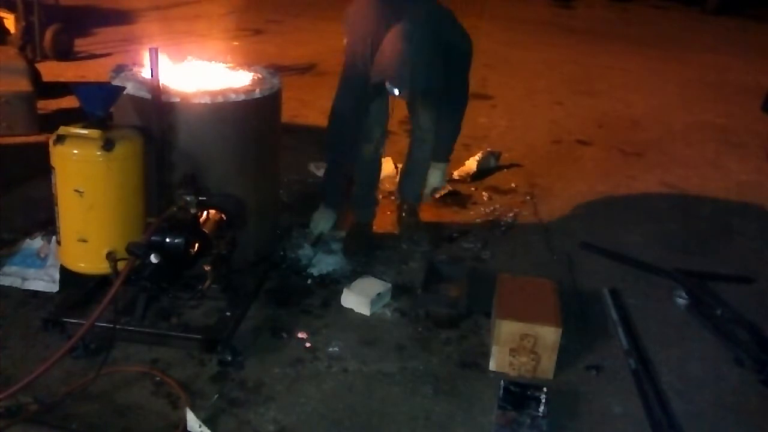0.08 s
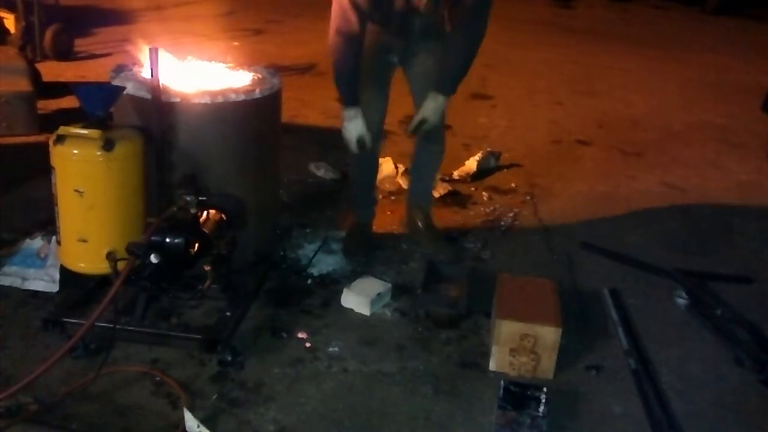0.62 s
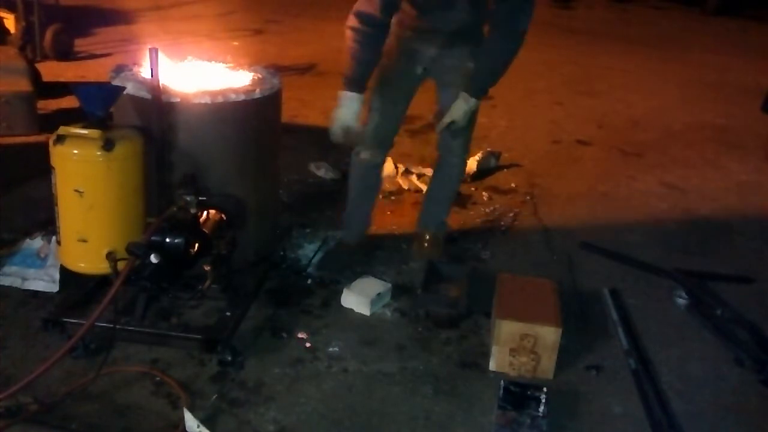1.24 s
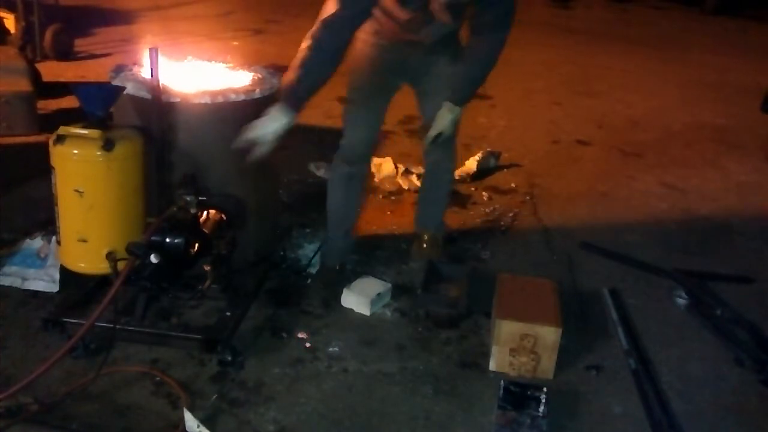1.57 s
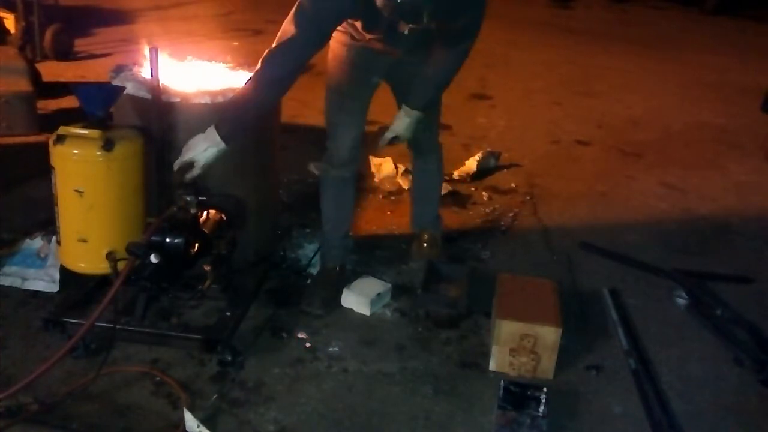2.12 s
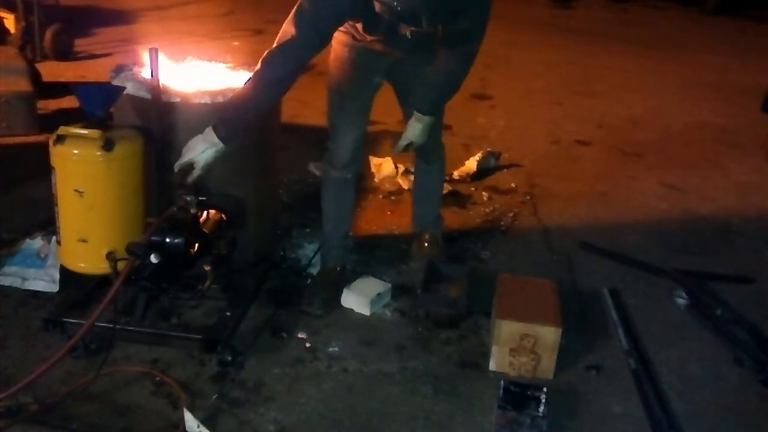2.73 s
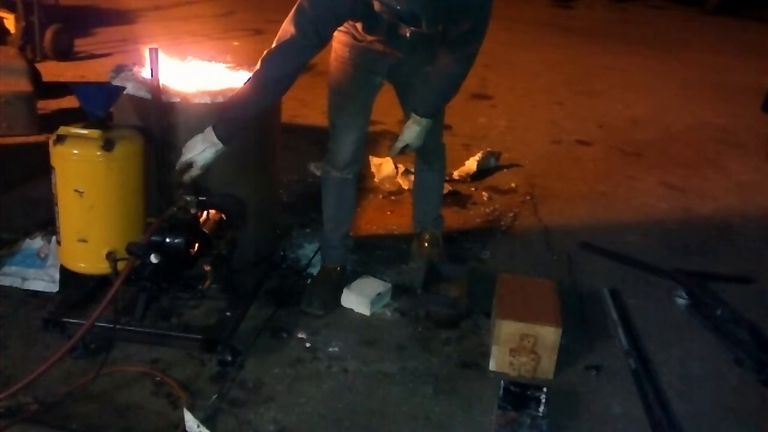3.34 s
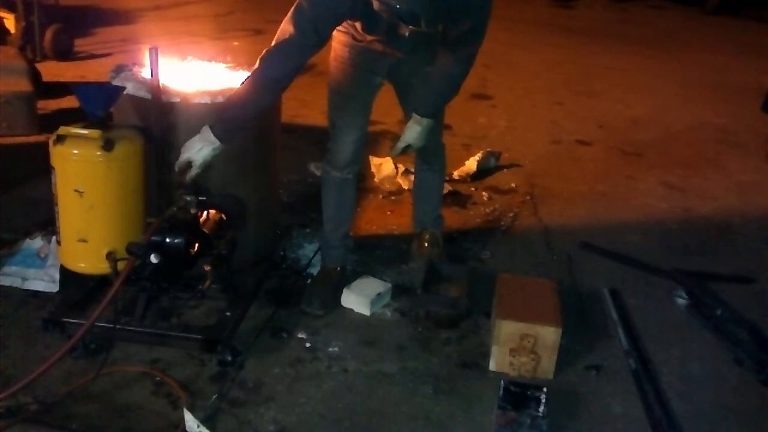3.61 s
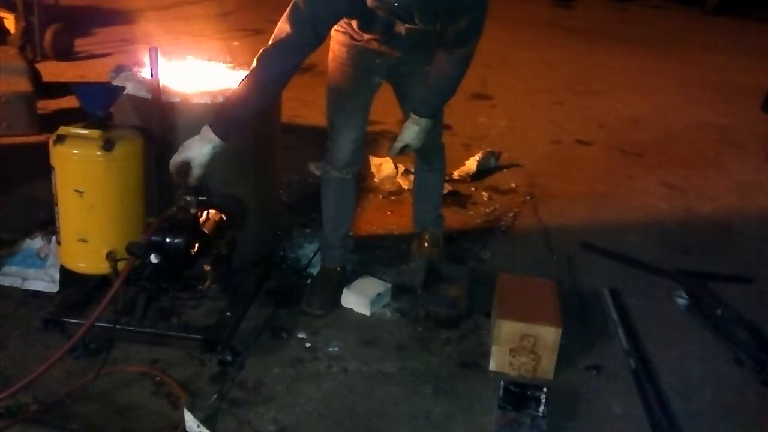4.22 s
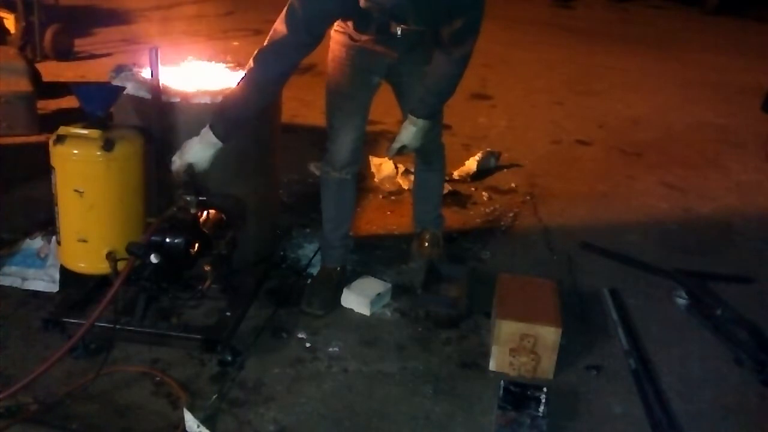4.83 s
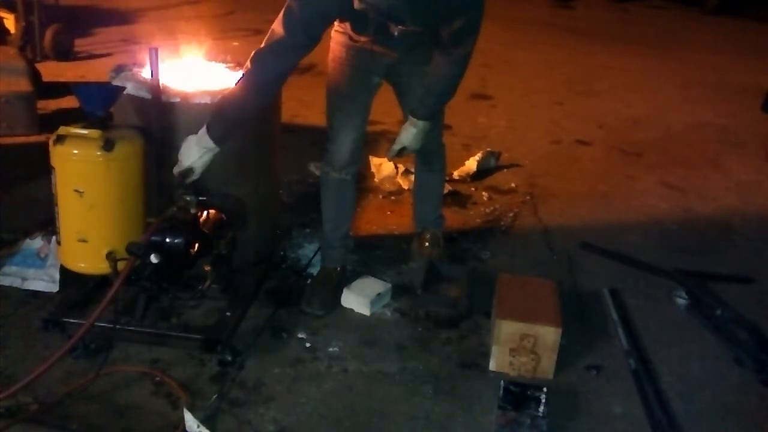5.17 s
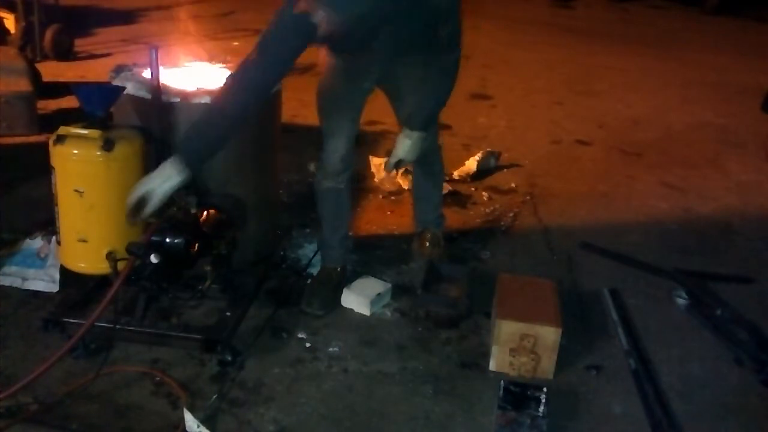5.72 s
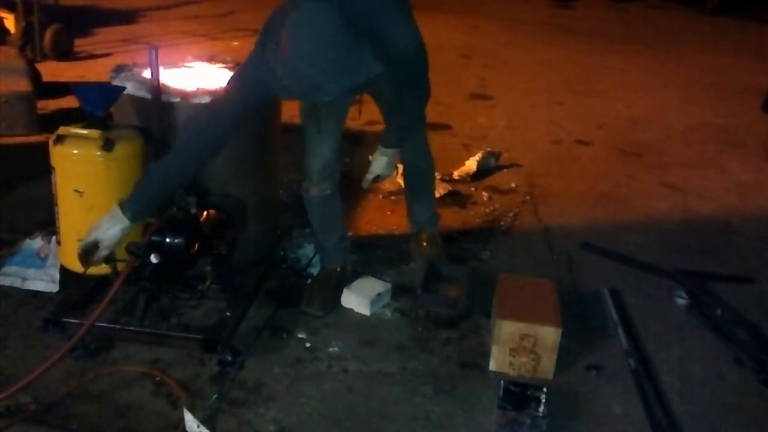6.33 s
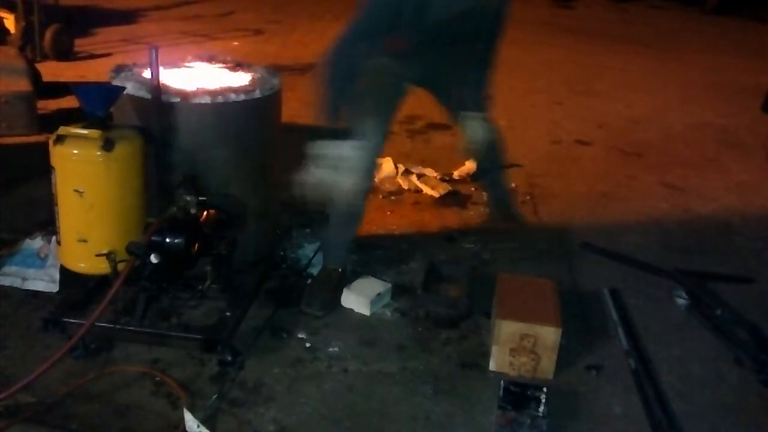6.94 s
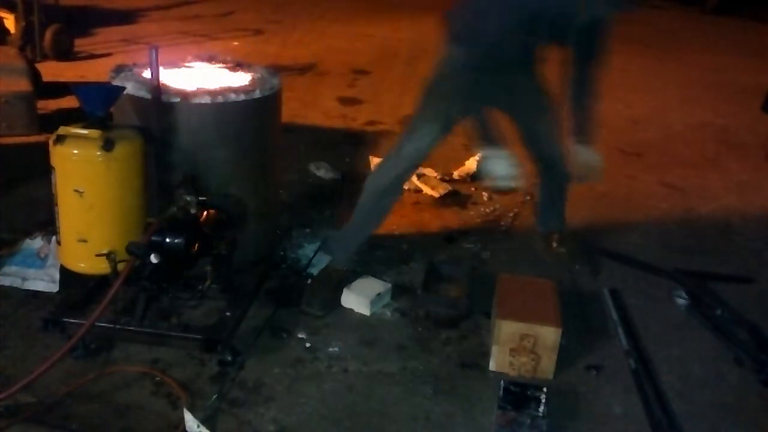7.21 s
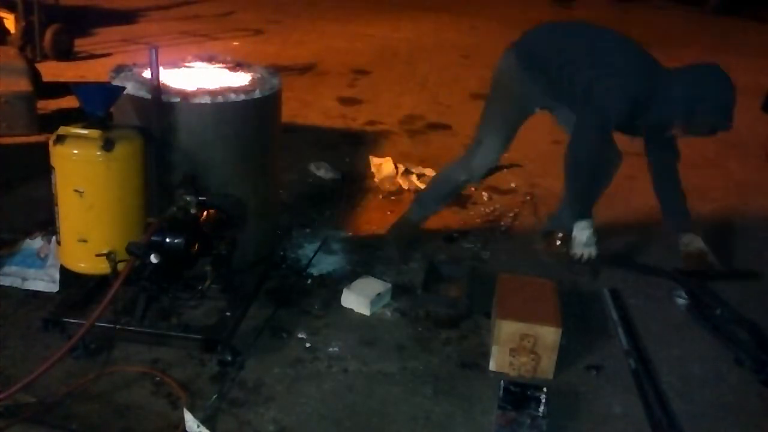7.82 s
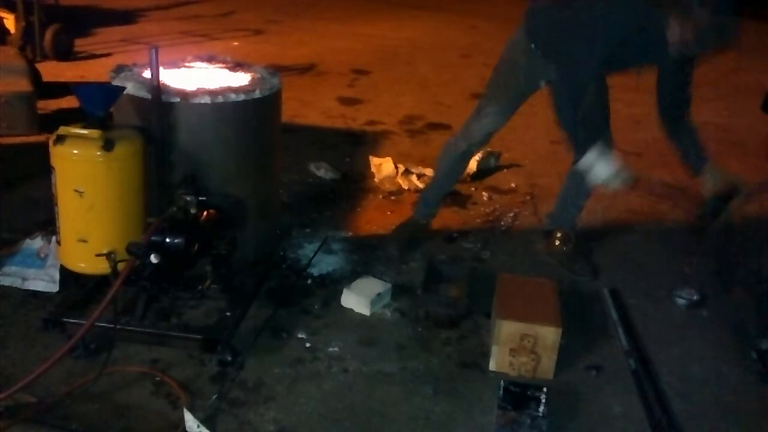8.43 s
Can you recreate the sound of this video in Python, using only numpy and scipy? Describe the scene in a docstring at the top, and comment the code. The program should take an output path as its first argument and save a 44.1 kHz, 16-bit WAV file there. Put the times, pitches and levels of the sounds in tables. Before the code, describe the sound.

From the start, an air-blown burner roars in a small furnace nearby, low and turbulent, throbbing unevenly over the hiss of its nozzle. At about 4 seconds a valve is eased: the flame turns softer and deeper, and a high hiss joins in. Around 4.5 seconds a second turn brings a brief, wavering whistle that falls in pitch, and the roar dies away by 5 seconds. The air jet stops at about 5.3 seconds. What remains is much quieter: a thin, steady hiss like a leaking line over the workshop's low hum. At 6.5 seconds the fuel tank gives a very faint ring as a hand brushes it. A foot lands with a soft, dull thud near 7.2 seconds. At about 8.5 seconds a steel tool scrapes briefly on the concrete with a sharp, bright clank.

```python
"""A workshop floor, where an air-blown burner roars in a small melting furnace.
Turbulent burning rings the furnace and air hisses through the nozzle. A valve is closed in two turns,
its narrowing gap whistling downward; the flame goes soft and dies, and the air jet stops.
A thin hiss stays over the room's hum, like a leaking line. A hand brushes the fuel tank, a foot lands,
then a steel tool scrapes and clanks on the concrete."""
import sys
import numpy as np
from scipy.fft import rfft, irfft, next_fast_len
from scipy.io import wavfile
from scipy.ndimage import uniform_filter1d, minimum_filter1d

SR = 44100
rng = np.random.default_rng(int(sys.argv[2]) if len(sys.argv) > 2 else 0)


def bounce(signal):
    """Save signal as a 16-bit WAV file at the path given by the first command-line argument."""
    frames = np.transpose(np.atleast_2d(signal))
    limited = np.clip(frames, -1, 1)
    pcm = np.round(limited * 32767).astype(np.int16)
    wavfile.write(sys.argv[1], SR, pcm)


N = 378819
TIME = np.arange(N) / SR
FFT_SIZE = next_fast_len(N + SR // 4)
HZ = np.maximum(np.arange(FFT_SIZE // 2 + 1) * SR / FFT_SIZE, 1)
DIRECT = np.array([[1], [0]])   # sources are (direct, scattered) pairs; this one is direct only


def from_db(db):
    """Decibels to gain."""
    return 10 ** (np.asarray(db) / 20)


def unit_rms(x):
    """Scale to unit power."""
    return x / np.sqrt(np.mean(x ** 2) + 1e-20)


def over_time(rows):
    """Interpolate each column after the time column, per sample."""
    times_s, *columns = np.transpose(rows)
    return [np.interp(TIME, times_s, column) for column in columns]


def over_hz(points):
    """Interpolate on a log frequency axis."""
    hz, value = np.transpose(points)
    return np.interp(np.log(HZ), np.log(hz), value)


def filtered(x, response):
    """Apply a frequency response."""
    return irfft(rfft(x, FFT_SIZE) * response, FFT_SIZE)[..., :N]


def lowpass(corner_hz, order):
    """Response that halves at the corner."""
    return 1 / (1 + (HZ / corner_hz) ** order)


def peak(centre_hz, half_width_hz):
    """Response of one resonance, 1 at its centre."""
    return 1 / (1 + ((HZ - centre_hz) / half_width_hz) ** 2)


def colour(spectrum, resonances=()):
    """Broad spectrum plus resonances, rolled off below 20 Hz."""
    lift_db = sum(db * peak(hz, width_hz / 2) for hz, width_hz, db in resonances)
    return from_db(over_hz(spectrum) + lift_db) * (1 - lowpass(20, 2))


def noise(response):
    """Two independent noises of one colour: direct and scattered."""
    return unit_rms(filtered(rng.standard_normal((2, N)), response))


def drift(rate_hz):
    """Random wander at unit RMS."""
    return unit_rms(filtered(rng.standard_normal(N), lowpass(rate_hz, 4)))


def air_band(pitch_hz, half_width_hz):
    """Noise band centred on a moving pitch."""
    phase = 2 * np.pi * np.cumsum(pitch_hz) / SR
    narrow = lowpass(half_width_hz, 2)
    return noise(narrow) * np.cos(phase) + noise(narrow) * np.sin(phase)


def reflections(level_db, above_hz, count=60):
    """Echoes from floor, gear and walls comb the treble."""
    echoes = np.zeros((2, N))
    for row in echoes:
        signs = rng.choice([-1, 1], count)
        delays_s = rng.uniform(.006, .035, count)
        row[(delays_s * SR).astype(int)] = signs / np.sqrt(count)
    share = from_db(level_db) * (1 - lowpass(above_hz, 2))
    return (1 + share * rfft(echoes, FFT_SIZE)) / np.sqrt(1 + share ** 2)


def bursts(rows, t60_s):
    """Envelope of blows: instant attack, exponential decay."""
    return sum((TIME >= s) * from_db(db - 60 * np.abs(TIME - s) / t60_s) for s, db in rows)


def swell(at_s, rise_s, fall_s):
    """Smooth rise to 1 and fall back."""
    return np.exp(-((TIME - at_s) / np.where(TIME < at_s, rise_s, fall_s)) ** 2)


def hand_turn(start_s, length_s):
    """Smooth ramp from 0 to 1."""
    return .5 - .5 * np.cos(np.pi * np.clip((TIME - start_s) / length_s, 0, 1))


# Room hum. Each row: frequency in Hz, relative density in dB.
HUM_SPECTRUM = [(22, -2.5), (56, 4.5), (95, -4.5), (130, 0.5), (190, -11), (280, -11), (450, -16),
                (730, -16.5), (850, -19), (1100, -31), (2000, -25), (5000, -35.5)]
# Each row: centre in Hz, width in Hz, lift in dB.
HUM_RESONANCES = [(239, 16, 5), (766, 40, 2)]
# Each row: frequency in Hz, level in dB.
MOTOR_TONES = [(272.8, -56.5), (409.1, -53)]

def workshop(hum_db=-38.0):
    """Low room noise with the faint tones of a distant motor."""
    hum = noise(colour(HUM_SPECTRUM, HUM_RESONANCES) * reflections(level_db=-6.0, above_hz=500))
    motor = sum(from_db(db) * np.sin(2 * np.pi * hz * TIME) for hz, db in MOTOR_TONES)
    return from_db(hum_db) * hum + DIRECT * motor


# Each row: frequency in Hz, relative density in dB.
LEAK_SPECTRUM = [(1000, -11.5), (1900, -16), (2650, -10), (3200, -1), (3900, 0.5), (4400, -10.5),
                 (5000, -4.5), (5800, -6.5), (6600, -10.5), (8000, -19), (11000, -20), (12200, -14),
                 (14500, -35)]
# Each row: centre in Hz, width in Hz, lift in dB.
LEAK_RESONANCES = [(2835, 55, 6), (3260, 45, 6), (3488, 52, 7), (3725, 77, 5.5), (5680, 48, 8)]
# Each row: time in seconds, level in dB before gain_db.
LEAK_LEVELS = [(5.4, -43), (6.3, -43.5), (6.75, -45.5), (7.6, -43.5), (8.4, -45.5)]

def leak(gain_db=5.0):
    """A thin hiss, like a leaking line, that outlasts the flame."""
    level_db, = over_time(LEAK_LEVELS)
    hiss = noise(colour(LEAK_SPECTRUM, LEAK_RESONANCES) * reflections(level_db=-2.5, above_hz=1500))
    return from_db(level_db + gain_db) * hiss


# Each row: start in seconds, level in dB.
TANK_TOUCHES = [(6.51, -41)]

def tank(ring_hz=775, t60_s=.3):
    """The fuel tank rings softly as the hand lets go of its tap."""
    return DIRECT * bursts(TANK_TOUCHES, t60_s) * np.sin(2 * np.pi * ring_hz * TIME)


# Each row: start in seconds, level in dB.
FOOTSTEPS = [(7.17, -29.5)]

def footstep(thud_hz=130, t60_s=0.21):
    """A foot lands on the floor with a dull thud."""
    return bursts(FOOTSTEPS, t60_s) * noise(HZ * lowpass(thud_hz, 6))


# Tool strikes on the floor. Each row: start in seconds, relative level in dB.
KNOCKS = [(8.482, -27), (8.521, -11.5), (8.5245, -7.5), (8.5384, -21)]
# Pitches that ring in the clank, from tool and recorder housing.
# Each row: frequency in Hz, relative level in dB, T60 in seconds.
CLANK_MODES = [(928, -18, .15), (1520, -11, .08), (2090, 1, 0.054), (2225, 2, 0.083), (2470, 0, .13),
               (2925, -1, .08), (3230, -1, .09), (3518, 6, 0.063), (3607, -3, .1), (3811, -4, .12),
               (4254, -3, .1), (5380, -1, .06), (6169, -5, .08), (6480, -8, .06)]
# Steel on concrete. Each row: frequency in Hz, relative density in dB.
CRUNCH_SPECTRUM = [(300, -25), (850, -12), (1700, -11), (2150, 3), (2600, 2.5), (3600, 2), (4800, -3),
                   (6500, -7.5), (9000, -18), (15000, -42)]

def tool_drag(start_s=8.486, attack_s=0.012, hold_s=0.059, t60_s=.075, drag_db=-23.5, grain_db=2):
    """Gritty envelope of the tool's short slide over the floor."""
    since_s = TIME - start_s
    bite = np.exp(np.clip(since_s / attack_s, -20, 0))
    release_db = -60 * np.maximum(since_s - hold_s, 0) / t60_s
    return bite * from_db(drag_db + release_db + grain_db * drift(rate_hz=1000))


def tool(knock_t60_s=0.046, crunch_db=-4.5, rub_db=-22, ring_db=-13.0, contact_hz=13000,
         tail_db=-12, tail_t60_s=0.32):
    """Drag and knocks crunch on the concrete and excite a ringing clank; the walls add a tail."""
    drag = tool_drag()
    crunch = (drag + bursts(KNOCKS, knock_t60_s)) * noise(colour(CRUNCH_SPECTRUM))
    force = from_db(rub_db) * drag * rng.standard_normal((2, N))
    for start_s, db in KNOCKS:
        force[0, round(start_s * SR)] += from_db(db)   # direct only
    t = TIME[:SR // 4]
    modes = sum(from_db(db - 60 * t / t60_s) * np.cos(2 * np.pi * hz * t)
                for hz, db, t60_s in CLANK_MODES)
    ring = filtered(force, rfft(modes, FFT_SIZE) * lowpass(contact_hz, 6))
    clank = from_db(crunch_db) * crunch + from_db(ring_db) * ring
    walls = rng.standard_normal((2, len(t))) * from_db(-60 * t / tail_t60_s)
    walls = unit_rms(walls) / np.sqrt(len(t))   # unit energy
    return clank + from_db(tail_db) * filtered(clank, rfft(walls, FFT_SIZE))


EASED = hand_turn(start_s=3.88, length_s=0.32)
THROTTLED = hand_turn(start_s=4.521, length_s=.36)
VALVE_SPURT = swell(at_s=4.6, rise_s=0.049, fall_s=0.057)   # hiss swells as the second turn begins

def valve_db(open_db, eased_db=0, throttled_db=0):
    """Open-valve level plus the change from each of the two turns."""
    return open_db + eased_db * EASED + throttled_db * THROTTLED


# Each row: frequency in Hz, relative density in dB.
SEAT_SPECTRUM = [(3000, -14), (4400, -4), (8500, -5), (9400, -1), (10200, -8), (11200, -2.5), (15500, -9)]
# Each row: centre in Hz, width in Hz, lift in dB.
SEAT_RESONANCES = [(8990, 130, 3), (9400, 220, 6.5), (9760, 140, 6)]

def valve_seat(flutter, flutter_db=1.5, spurt_db=5.0):
    """Air squeezed past the nearly shut valve gives a high, half-whistling hiss."""
    level_db = valve_db(-37.0, throttled_db=-1.9) + spurt_db * VALVE_SPURT
    hiss = noise(colour(SEAT_SPECTRUM, SEAT_RESONANCES) * reflections(level_db=-2, above_hz=1000))
    return EASED * from_db(level_db + flutter_db * flutter) * hiss


# Each row: time in seconds, pitch in Hz, level in dB.
WHISTLE_GLIDE = [(4.5, 4450, -49), (4.56, 4320, -28), (4.61, 4080, -28), (4.645, 3800, -22),
                 (4.695, 3200, -34), (4.77, 2760, -38), (4.84, 2280, -47)]

def valve_whistle(waver_hz=80, flicker_db=3.0, octave_db=-15, rush_ratio=1.09):
    """The closing gap sings a falling, wavering tone with a breathy octave, in a band of rushing air."""
    pitch_hz, level_db = over_time(WHISTLE_GLIDE)
    phase = 2 * np.pi * np.cumsum(pitch_hz + waver_hz * drift(rate_hz=346)) / SR
    tone = np.sin(phase) * from_db(flicker_db * drift(rate_hz=81))
    whistle = DIRECT * tone + from_db(octave_db) * air_band(2 * pitch_hz, half_width_hz=260)
    rush = air_band(rush_ratio * pitch_hz, half_width_hz=600)
    rush_db = valve_db(-33.5, throttled_db=-33)
    return EASED * (from_db(level_db) * whistle + from_db(rush_db) * rush)


# Each row: time in seconds, swing about the mean in dB.
SUPPLY_SURGES = [(0.08, 0.5), (0.35, -0.7), (1.47, 1.0), (1.65, -1), (2.25, -1.5), (3.2, 1.64),
                 (3.55, -0.6)]

def surge_db():
    """The air supply swings a little and settles once the valve is eased."""
    swing_db, = over_time(SUPPLY_SURGES)
    return swing_db * (1 - EASED)


# Each row: frequency in Hz, relative density in dB.
JET_SPECTRUM = [(1200, -9.5), (2400, -4.5), (2750, 0.5), (3200, 2.5), (4000, 6), (4600, -0.5), (5200, -6.5),
                (8000, -2), (10400, -6.5), (12000, -9.5), (15500, -24)]
# Peaks and dips that colour the air hiss. Each row: centre in Hz, width in Hz, lift in dB.
HISS_RESONANCES = [(2200, 61, 9), (3085, 110, 7.5), (3660, 91, 4), (3985, 91, 2.5), (5590, 160, 9.5),
                   (5900, 150, -7), (6600, 180, 5), (8050, 100, 5), (9000, 430, -4.5), (9560, 400, 6.5),
                   (10700, 380, -4), (11100, 130, 11), (11360, 150, 7), (12250, 120, 9)]

def jet(flutter, flutter_db=2.0, spurt_db=1.0):
    """Air hisses through the nozzle and sputters with the flame."""
    level_db = valve_db(-33.0, eased_db=0.37, throttled_db=-7.0) + surge_db() + spurt_db * VALVE_SPURT
    hiss = noise(colour(JET_SPECTRUM, HISS_RESONANCES) * reflections(level_db=-6.5, above_hz=400))
    return from_db(level_db + flutter_db * flutter) * hiss


# Combustion noise. Each row: frequency in Hz, relative density in dB.
ROAR_SPECTRUM = [(22, -23), (50, -5), (100, -6.5), (140, -9), (200, -3), (330, 1.5), (450, -6), (565, -9.5),
                 (625, -18.5), (740, -17), (900, -22.5), (1100, -31.5), (1700, -38.5), (6000, -46)]
# Furnace and surroundings. Each row: centre in Hz, width in Hz, lift in dB.
FURNACE_RESONANCES = [(165, 21.7, 9), (236, 31, -3.5), (319, 47, 5), (403, 17, -5), (431.7, 19.5, 6.5),
                      (465, 19, -5.5), (493, 15, 3), (570, 14, 3.5), (704, 18, 8.5), (877, 38, 5),
                      (925, 15, 8), (975, 13, 6.5), (1124, 23, 9), (1242, 27, 8), (1321, 29, 8.5),
                      (1466, 25, 9), (1870, 53, 8)]
# Brief flares and sags. Each row: peak time in seconds, level change in dB.
THROBS = [(0.305, 3.5), (1.175, 2.5), (1.553, 4), (1.787, 5), (1.84, -3), (1.935, 3.5), (2.24, -1),
          (2.555, 2.5), (2.785, -5), (2.87, 3), (3.42, 2.5), (3.64, 4), (4.04, -5.5), (4.583, 2),
          (4.745, 4.5), (5.15, 2), (5.225, 1.5)]
# The flame tears. Each row: peak time in seconds, treble lift in dB.
RASPS = [(0.045, 5), (2.543, 4), (3.307, 3)]

def flame(flutter, flutter_db=1.0, spurt_db=1.0, swell_s=0.025, boom_hz=96, edge_hz=590,
          woof_hz=225, woof_db=-10.0, note_hz=320, soft_note_hz=362):
    """Turbulent burning rings the furnace; a soft flame gains bass, lifts its note and loses its edge."""
    level_db = valve_db(-9.5, eased_db=-2.56, throttled_db=-22.0)
    level_db += 0.88 * surge_db() + spurt_db * VALVE_SPURT
    soft_db = valve_db(0, eased_db=9.7, throttled_db=9.7)
    throb_db = sum(db * swell(at_s, swell_s, swell_s) for at_s, db in THROBS)
    rasp_db = sum(db * swell(at_s, swell_s, swell_s) for at_s, db in RASPS)
    roar = noise(colour(ROAR_SPECTRUM, FURNACE_RESONANCES) * reflections(level_db=-8, above_hz=1100))
    boom = filtered(roar, lowpass(boom_hz, 2))
    edge = filtered(roar, 1 - lowpass(edge_hz, 4))
    middle = roar - boom - edge
    woof = filtered(roar, from_db(woof_db) * peak(woof_hz, 35))
    note_shift = filtered(roar, 0.46 * (peak(soft_note_hz, 22) - peak(note_hz, 22)))
    body = middle + boom * from_db(soft_db) + EASED * (woof + note_shift)
    edge_db = rasp_db + flutter_db * flutter + 0.37 * throb_db - 0.095 * soft_db
    return from_db(level_db) * (body * from_db(throb_db) + edge * from_db(edge_db))


def burner(off_s=5.28, fade_s=0.06):
    """Flame, jet and valve sound until the valve seats and the air stops."""
    flutter = 0.61 * drift(rate_hz=12.6) + 0.5 * drift(rate_hz=190)   # slow surges, fast tearing
    airflow = .5 - .5 * np.tanh((TIME - off_s) / fade_s)
    return airflow * (flame(flutter) + jet(flutter) + valve_whistle() + valve_seat(flutter))


# Each row: frequency in Hz, left minus right in dB.
PORT_BALANCE = [(120, -1.6), (320, -2.7), (570, -4.5), (630, -1), (710, -13), (870, -9), (1000, -1),
                (2400, 0.2), (3100, -6), (4000, -3), (5200, 1), (6600, 8), (9500, 14.8), (11500, 9.1),
                (15000, 16.6)]
# Each row: frequency in Hz, left phase lead in radians.
PORT_LEAD = [(20, 3.306), (300, 3.17), (480, 3.3), (720, 4.01), (900, 5.97), (1850, 5.96), (2350, 3.56),
             (2780, 3.57), (3080, 6.3), (3600, 6.7), (4200, 7.22), (4800, 9.1), (5600, 11.27), (6500, 15.2),
             (7600, 15.5), (16000, 40)]
# Each row: frequency in Hz, left-right coherence from 0 to 1.
PORT_COHERENCE = [(100, 1), (330, .99), (560, 0.91), (640, 0.97), (900, 0.47), (1500, 0.79), (2050, 0.13),
                  (2550, 0.99), (3000, 0.52), (3900, 0.74), (4800, 0.83), (7000, 0.24), (14000, 0.27)]

def microphone_ports(sound):
    """Two close ports, each shaded in some bands; the bass arrives in opposite phase."""
    direct, scattered = rfft(sound, FFT_SIZE)
    coherence = np.clip(over_hz(PORT_COHERENCE), 0, 1)
    balance_db = over_hz(PORT_BALANCE)
    lead_rad = np.interp(HZ, *np.transpose(PORT_LEAD))
    shared = np.sqrt((1 + coherence) / 2) * direct
    apart = np.sqrt((1 - coherence) / 2) * scattered
    left = (shared + apart) * from_db(np.minimum(balance_db, 0))
    right = (shared - apart) * from_db(np.minimum(-balance_db, 0)) * np.exp(-1j * lead_rad)
    return irfft(np.array([left, right]), FFT_SIZE)[:, :N]


def scene():
    """All sources, in stereo."""
    return microphone_ports(burner() + leak() + workshop() + footstep() + tank() + tool())


def record(dry, ceiling=0.87, hold_s=0.00093, cutoff_hz=15560):
    """Fast peak limiter, then a steep low-pass."""
    needed_gain = np.minimum(1, ceiling / (np.abs(dry).max(axis=0) + 1e-9))
    span = int(hold_s * SR) + 1
    gain = uniform_filter1d(minimum_filter1d(needed_gain, span), span)
    return filtered(dry * gain, .5 - .5 * np.tanh((HZ - cutoff_hz) / 40))


dry = scene()
out = record(dry)
bounce(out)
```